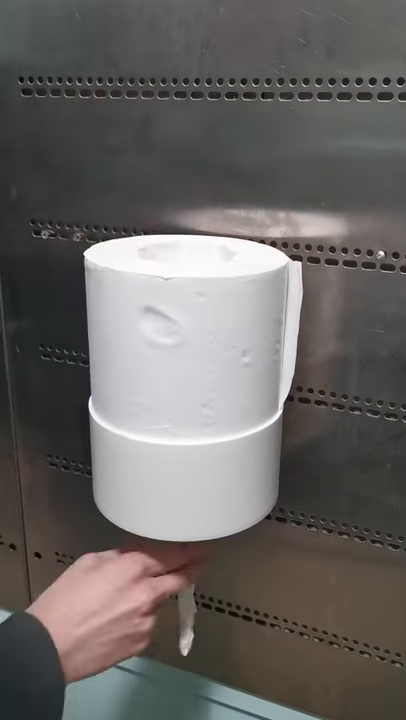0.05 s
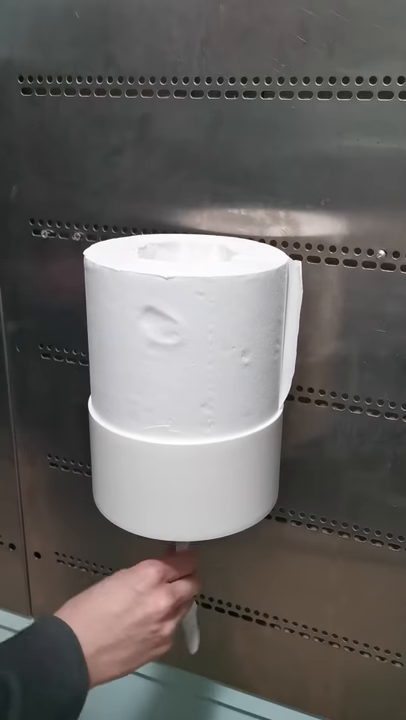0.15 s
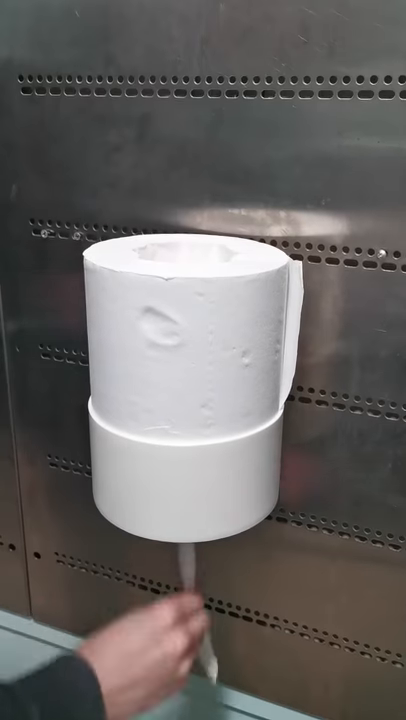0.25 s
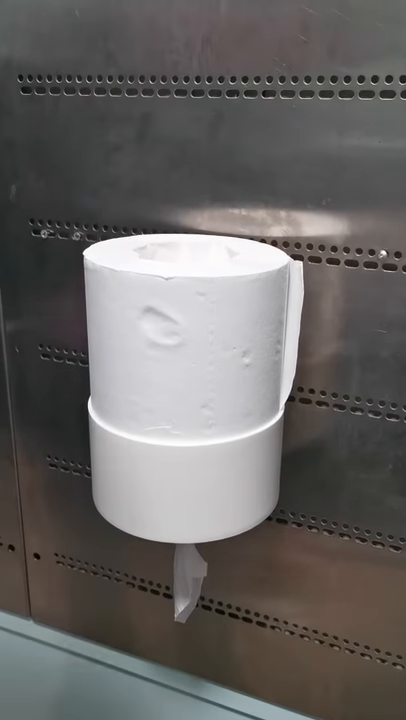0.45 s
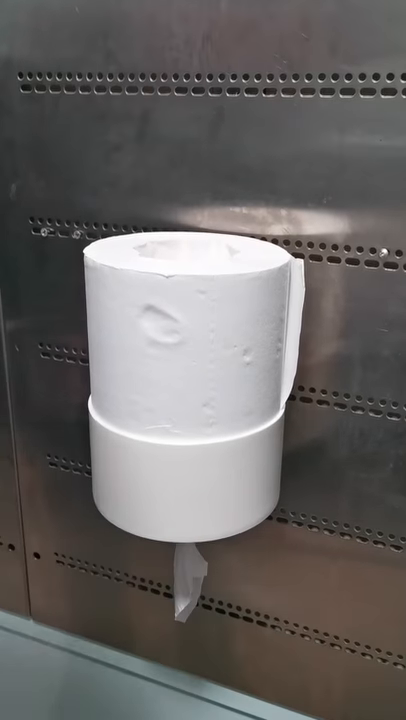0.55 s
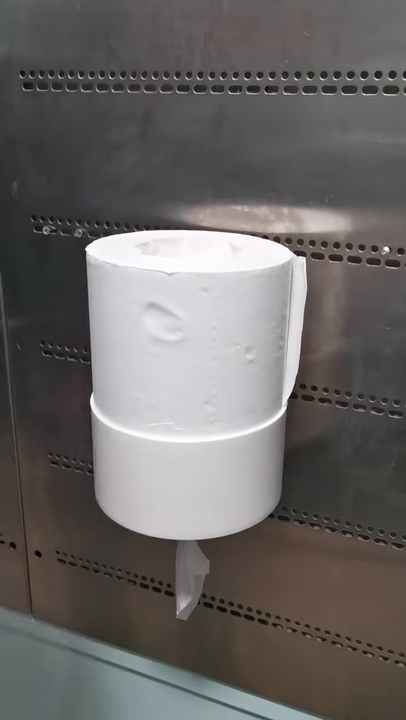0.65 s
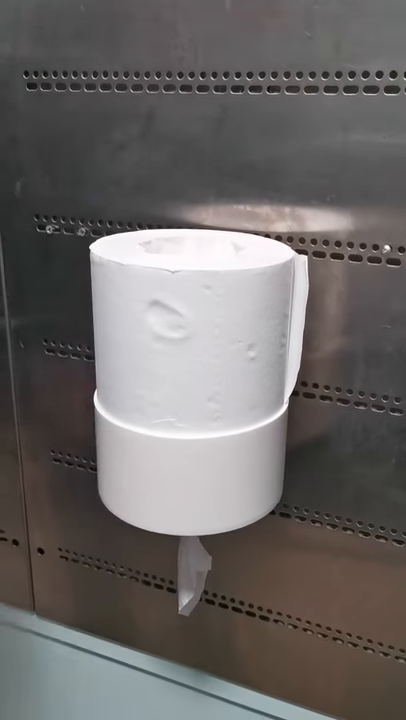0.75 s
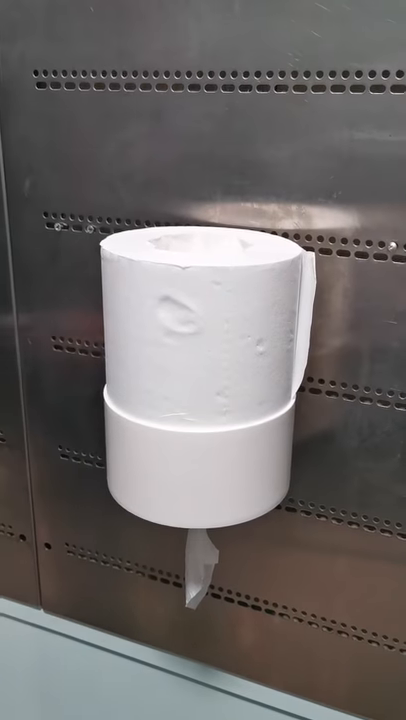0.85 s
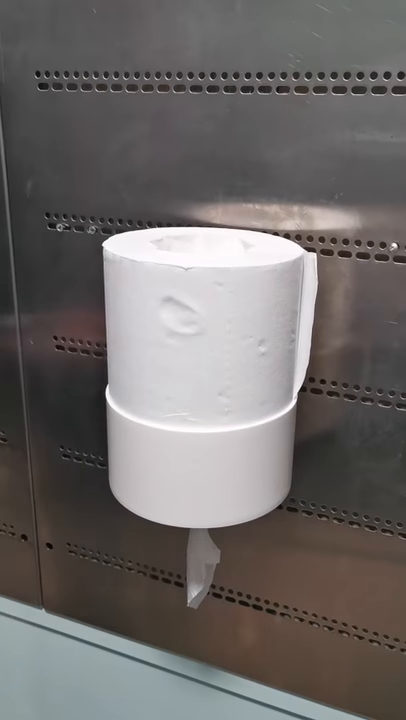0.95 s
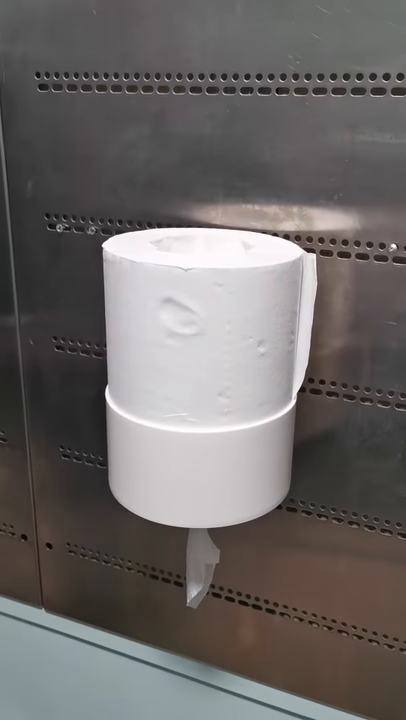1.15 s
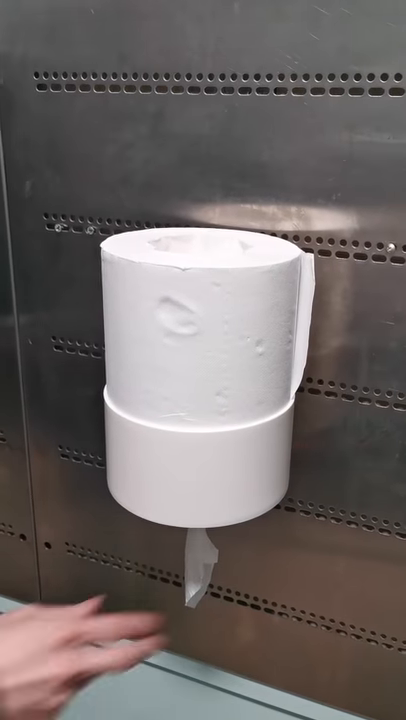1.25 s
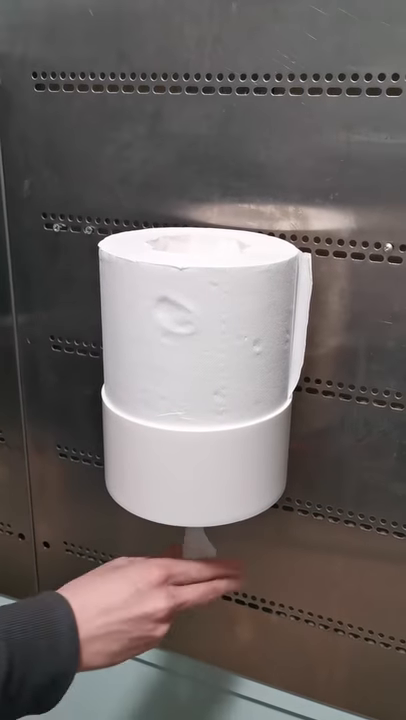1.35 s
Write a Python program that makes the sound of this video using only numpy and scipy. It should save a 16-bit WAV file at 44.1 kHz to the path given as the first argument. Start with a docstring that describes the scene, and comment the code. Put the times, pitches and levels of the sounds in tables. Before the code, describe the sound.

A paper towel is pulled from a roll holder, rasping from about 0.2 seconds in quick tugs that make the hollow holder hum. It rips at about 0.35 seconds with a short room echo. The freed sheet flaps softly once at 0.5 seconds, then paper and a sleeve rustle faintly on and off until about 1.4 seconds. A quiet, low ventilation rumble runs underneath.

```python
"""Kitchen: a hand pulls a paper towel down through the outlet of a wall-mounted roll holder.
The paper rasps and drags in small tugs that make the hollow holder hum, until the perforation rips.
The freed sheet flaps once; sheet and sleeve rustle softly over a low ventilation rumble."""
import sys
import numpy as np
from scipy import signal
from scipy.fft import rfft, irfft
from scipy.io import wavfile

SR = 44100
rng = np.random.default_rng(int(sys.argv[2]) if len(sys.argv) > 2 else 0)


def int16_out(signal):
    """Quantize to a 16-bit WAV file."""
    q = np.round(np.clip(np.atleast_2d(signal).T, -1, 1) * 32767)
    wavfile.write(sys.argv[1], SR, q.astype(np.int16))


N = 61739
TIME, FREQS = np.arange(N) / SR, np.fft.rfftfreq(N, 1 / SR)

# paper friction in the outlet (time [s], level [dB])
FRICTION = [(.18, -84), (.19, -62), (.222, -53), (.268, -45), (.305, -39.5), (.335, -42), (.358, -40.5),
            (.378, -52), (.41, -52.5), (.455, -58), (.5, -91)]
# sliding paper (frequency [Hz], density [dB])
RASP_SPECTRUM = [(60, 1), (160, -6.5), (280, 3), (600, 7.5), (900, 2), (1700, -3), (2700, -2.5), (3250, 3),
                 (4500, -2.5), (5600, -4.5), (7200, -5), (8400, -11), (10600, -3.5), (12800, -9.5),
                 (15800, -10)]
# perforation giving way (start [s], level [dB], decay [s])
RIP_BURSTS = [(0.3362, -27.5, .003), (0.3426, -27, 0.0048), (0.348, -33.5, 0.0029)]
# breaking fibres (frequency [Hz], density [dB])
RIP_SPECTRUM = [(60, -33), (170, -0.5), (270, 10), (450, 12), (750, -1), (1000, 1.5), (1700, -1.5),
                (2600, -7.5), (3300, 3.5), (4500, -1), (6000, -1), (7400, -3.5), (8700, -10.5), (10600, -2),
                (12500, -8), (15800, -5)]
# tugs of sticking paper (time [s], level [dB], half length [s])
HOLDER_TUGS = [(0.092, -59.5, 0.015), (0.16, -62, 0.0091), (0.212, -54, 0.015), (0.224, -50, 0.0069),
               (.243, -35, 0.0038), (0.254, -47, 0.0031), (.266, -40.5, 0.0058), (0.286, -36, 0.0048),
               (.297, -28.5, 0.0035), (.309, -31, 0.0049), (0.321, -29.5, 0.0045), (0.335, -35.5, 0.00506),
               (.353, -26.5, 0.0058), (0.375, -38, 0.0029), (.385, -39.5, 0.0062), (0.404, -48, .009),
               (0.429, -47, 0.0037)]
# sleeve and sheet (start [s], rise [s], hold [s], decay [s], level [dB], tilt [dB/oct], peak [Hz])
RUSTLE_STROKES = [(0, 0.0013, 0.048, 0.056, -54.5, -1, 3300), (0.185, 0.0025, 0.062, 0.033, -54, -1, 3770),
                  (0.465, 0.0068, 0.0094, 0.019, -50, -3.5, 3300),
                  (0.487, 0.013, 0.013, 0.06, -54.5, -1, 3300),
                  (0.584, 0.018, 0.066, 0.02, -61.5, -3, 3430),
                  (0.696, 0.0054, 0.052, 0.045, -57.5, 5, 6500), (0.8, .006, 0.09, 0.13, -62.5, 1, 3320),
                  (0.864, 0.036, 0.026, 0.087, -52.5, 0, 2750), (1.079, 0.026, 0.018, 0.042, -59, 4, 4360),
                  (1.228, 0.016, 0.02, 0.021, -62.5, -3.5, 3280), (1.37, 0.0076, .03, .04, -57, -0.5, 4600)]
# base rustle (frequency [Hz], density [dB])
RUSTLE_SPECTRUM = [(60, -27), (120, -13), (250, -2.5), (800, 0.5), (1500, -1.5), (2400, -1), (3200, 0),
                   (4300, -1), (5500, -6), (7000, -4.5), (8300, -11.5), (10300, -6.5), (12500, -11.5),
                   (15800, -8)]
# ventilation drone (frequency [Hz], density [dB])
VENT_SPECTRUM = [(15, -8), (40, -11.5), (65, -1), (100, -7), (160, -6), (250, -15), (500, -17),
                 (1000, -20.5), (2000, -24), (4000, -24.5), (8000, -32), (15800, -38.5)]
# deep rumble (time [s], level [dB])
RUMBLE_LEVEL = [(0, -57), (.3, -58.5), (.55, -60.5), (.83, -58.5), (.92, -65), (1.06, -68), (1.12, -56.5),
                (1.2, -65), (1.4, -57.5)]
# kitchen reverberation (frequency [Hz], T60 [s])
ROOM_T60 = [(150, 0.4), (500, 0.45), (2000, 0.62), (6000, 0.3), (15000, 0.3)]
# microphone pair (frequency [Hz], coherence [ratio, clipped to 0..1])
MIC_COHERENCE = [(300, 0.9), (640, 0.64), (1400, 0.14), (3000, -0.51)]
# microphone balance (frequency [Hz], left minus right [dB])
MIC_BALANCE = [(150, 1), (450, 0.5), (900, -4), (1500, -1), (2200, -3), (3200, -9), (4500, -7),
               (6500, -5.5), (8000, 1.5), (10400, -8), (13000, 0.5), (15800, -4)]


def amp(db):
    """dB to gain."""
    return 10 ** (np.asarray(db) / 20)


def unit(x):
    """Scale to rms 1."""
    return x / np.sqrt(np.mean(x ** 2) + 1e-20)


def read(points, hz):
    """Table lookup, log-frequency axis."""
    f, value = np.transpose(points)
    return np.interp(np.log(hz + 1), np.log(f + 1), value)


def shaped(x, gain):
    """Filter by per-bin gain."""
    return irfft(rfft(x) * gain, N)


def paired(x, mono_below_hz=150):
    """Two independent signals made coherent in the bass, as at two close microphones."""
    a, b = rfft(x)
    coherence = np.clip(read(MIC_COHERENCE, FREQS), 0, 1)
    coherence = 1 - (1 - coherence) * np.minimum(FREQS / mono_below_hz, 1) ** 2
    return irfft(np.array([coherence * a + np.sqrt(1 - coherence ** 2) * b, a]), N)


def crackle(per_s, spread_db, hiss_share=0.59):
    """Uneven fibre clicks in fine hiss; stereo, rms about 1."""
    sizes = amp(spread_db * np.minimum(rng.exponential(1, (2, N)), 4))
    signs = rng.choice([-1, 1], (2, N))
    clicks = unit(sizes * signs * (rng.random((2, N)) < per_s / SR))
    hiss = rng.standard_normal((2, N))
    return paired(np.sqrt(1 - hiss_share) * clicks + np.sqrt(hiss_share) * hiss)


def friction():
    """Friction envelope of the pull."""
    time_s, db = np.transpose(FRICTION)
    return amp(np.interp(TIME, time_s, db)) * (TIME > time_s[0]) * (TIME < time_s[-1])


def rasp():
    """Paper scrapes through the outlet."""
    grain = crackle(per_s=5000, spread_db=4)
    return shaped(grain * friction(), unit(amp(read(RASP_SPECTRUM, FREQS))))


def rip(rise_s=0.003):
    """Perforation parts: three quick bursts of snapping fibres."""
    envelope = np.zeros(N)
    for start_s, db, decay_s in RIP_BURSTS:
        age_s = TIME - start_s
        attack = np.clip(age_s / rise_s, 0, 1)
        envelope += amp(db) * attack * np.exp(-np.maximum(age_s - rise_s, 0) / decay_s)
    grain = crackle(per_s=9000, spread_db=2.8)
    return shaped(grain * envelope, unit(amp(read(RIP_SPECTRUM, FREQS))))


def holder(pitch_hz=426, waver_hz=11, waver_rate_hz=60, width_hz=320, rub_db=-4, right_lag_s=0.00016):
    """Hollow holder hums at one wavering pitch; tugs swell it, friction roughens it."""
    waver = unit(shaped(rng.standard_normal(N), 1 / (1 + (FREQS / waver_rate_hz) ** 4)))
    tone = unit(np.sin(2 * np.pi * np.cumsum(pitch_hz + waver_hz * waver) / SR))
    swell = sum(amp(db) * np.exp(-((TIME - at_s) / half_s) ** 2) for at_s, db, half_s in HOLDER_TUGS)
    resonance = 1 / (1 + (2 * (FREQS - pitch_hz) / width_hz) ** 2) ** 2
    rub = unit(shaped(rng.standard_normal(N), resonance))
    hum = tone * swell + amp(rub_db) * rub * friction()
    return np.array([hum, np.interp(TIME - right_lag_s, TIME, hum)])


def rustles(peak_db=6.5, peak_width_oct=0.14, knee_hz=800, left_db=-0.5):
    """Sleeve and loose sheet brush softly; each stroke has its own tilt and one scratchy peak."""
    out, grain = np.zeros((2, N)), crackle(per_s=3000, spread_db=4)
    for start_s, rise_s, hold_s, decay_s, db, tilt_db_oct, peak_hz in RUSTLE_STROKES:
        age_s = TIME - start_s
        attack = np.clip(age_s / rise_s, 0, 1)
        release = np.exp(-np.maximum(age_s - rise_s - hold_s, 0) / decay_s)
        scratch_db = peak_db * np.exp(-(np.log2((FREQS + 1) / peak_hz) / peak_width_oct) ** 2)
        tilt_db = tilt_db_oct * np.log2(1 + FREQS / knee_hz)
        colour = unit(amp(read(RUSTLE_SPECTRUM, FREQS) + tilt_db + scratch_db))
        out += amp(db) * attack * release * shaped(grain, colour)
    return out * amp([[left_db], [0]])


def flap(at_s=0.502, level_db=-59, half_s=0.018, pitch_hz=228):
    """Torn sheet swings free: one soft, low pulse."""
    tone = unit(np.sin(2 * np.pi * (pitch_hz * TIME + rng.random())))
    return amp(level_db) * np.exp(-((TIME - at_s) / half_s) ** 2) * tone


def ventilation(drone_db=-58.5, rumble_hz=35.9, rumble_width_oct=0.69):
    """Steady low drone with faint hiss; deep rumble comes and goes."""
    drone = unit(shaped(paired(rng.standard_normal((2, N))), amp(read(VENT_SPECTRUM, FREQS))))
    band = np.exp(-(np.log2((FREQS + 1) / rumble_hz) / rumble_width_oct) ** 2)
    rumble = unit(shaped(rng.standard_normal(N), band))
    rumble_db = np.interp(TIME, *np.transpose(RUMBLE_LEVEL))
    return amp(drone_db) * drone + amp(rumble_db) * rumble


def kitchen(x, onset_s=0.0029):
    """Dense reflections off steel and hard walls; treble dies first."""
    hz, time_s, noise = signal.stft(paired(rng.standard_normal((2, N))), SR, nperseg=256)
    decay = amp(-60 * time_s / read(ROOM_T60, hz)[:, None])
    tail = signal.istft(noise * decay, SR, nperseg=256)[1][:, :N]
    tail *= np.clip(TIME / onset_s, 0, 1)
    return signal.fftconvolve(x, tail / np.linalg.norm(tail[0]), axes=1)[:, :N]


def scene(paper_send_db=-8, hum_send_db=-14.5):
    """Paper and holder with reverb; rustles, ventilation and flap dry."""
    paper, hum = rasp() + rip(), holder()
    reverb = kitchen(amp(paper_send_db) * paper + amp(hum_send_db) * hum)
    return paper + hum + reverb + rustles() + ventilation() + flap()


def record(dry, cutoff_hz=15800):
    """Right microphone catches more treble; then low-pass."""
    left_ratio = amp(read(MIC_BALANCE, FREQS))
    balance = np.array([left_ratio, np.ones_like(left_ratio)]) * np.sqrt(2 / (1 + left_ratio ** 2))
    lowpass = signal.firwin(1023, cutoff_hz, window=("kaiser", 9), fs=SR)
    return signal.oaconvolve(shaped(dry, balance), lowpass[None], "same")


dry = scene()
out = record(dry)
int16_out(out)
```